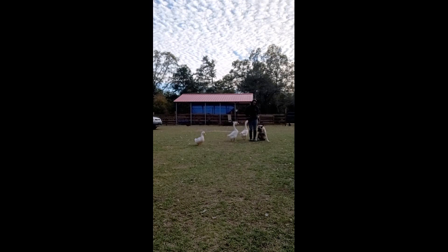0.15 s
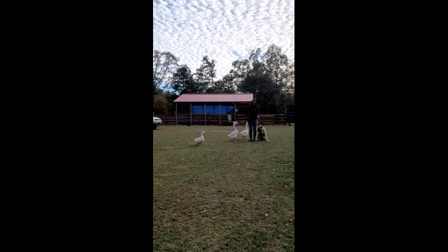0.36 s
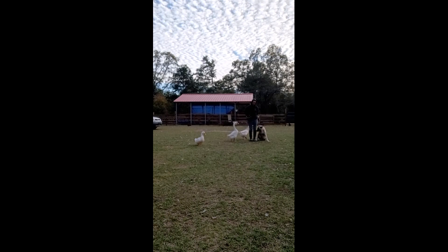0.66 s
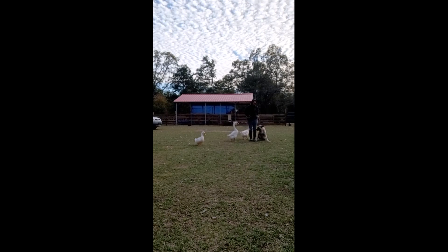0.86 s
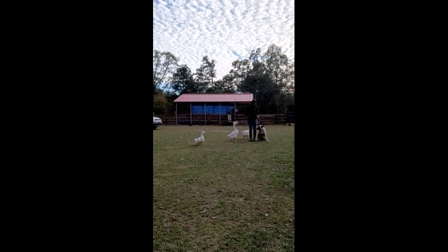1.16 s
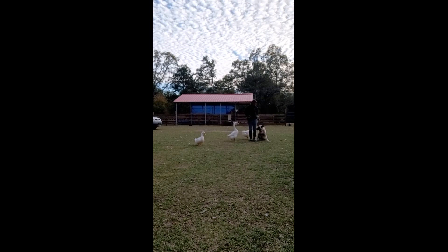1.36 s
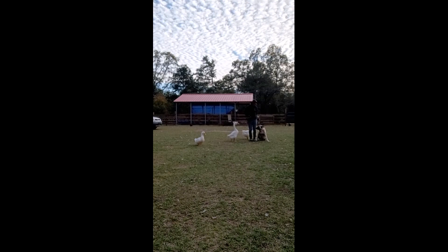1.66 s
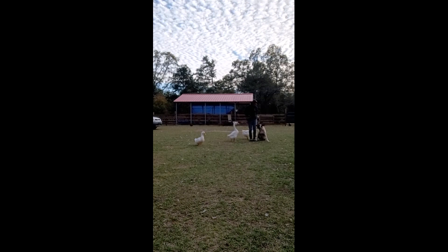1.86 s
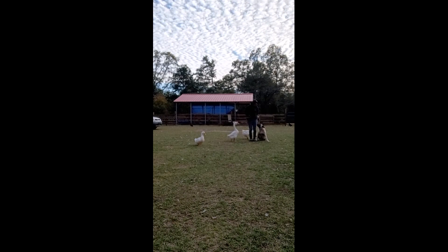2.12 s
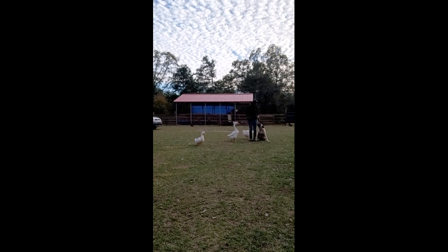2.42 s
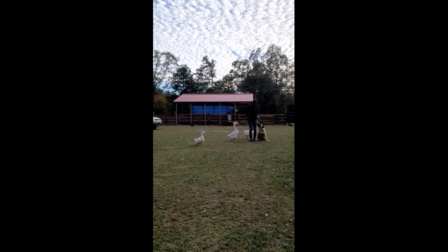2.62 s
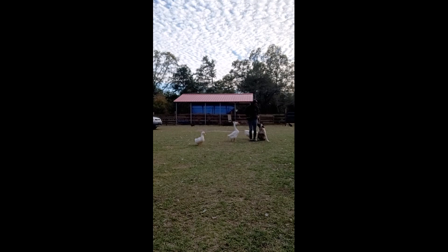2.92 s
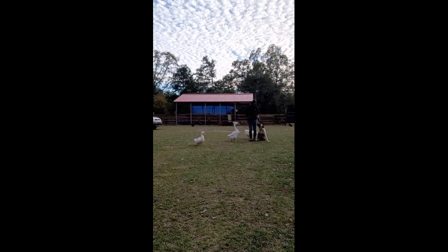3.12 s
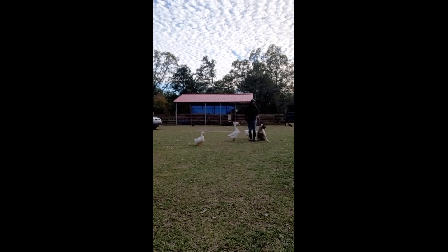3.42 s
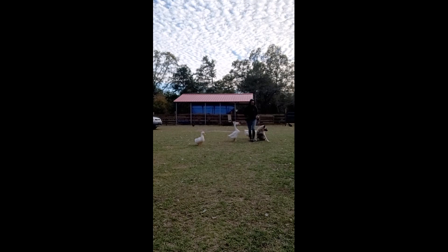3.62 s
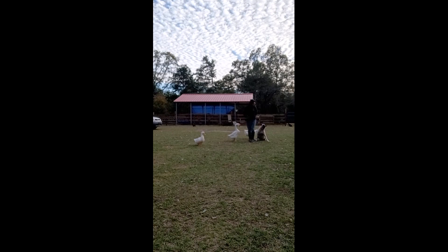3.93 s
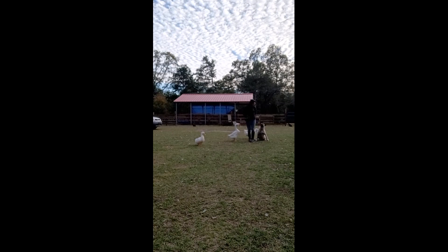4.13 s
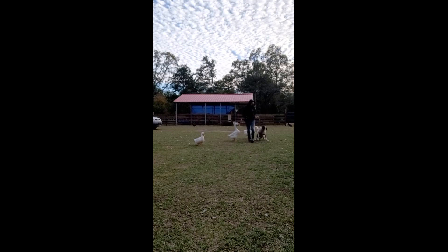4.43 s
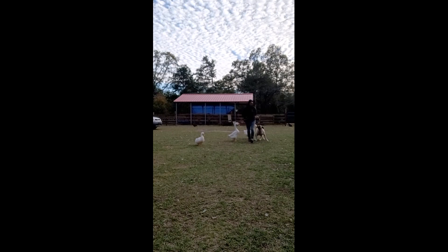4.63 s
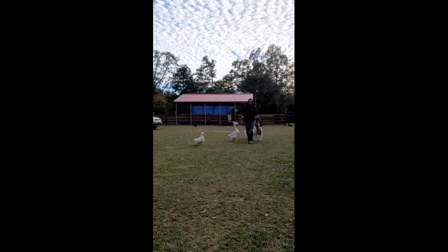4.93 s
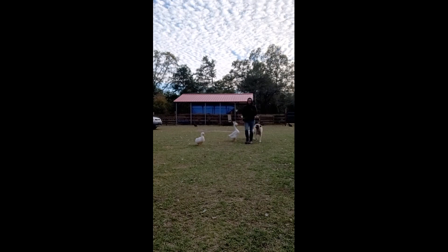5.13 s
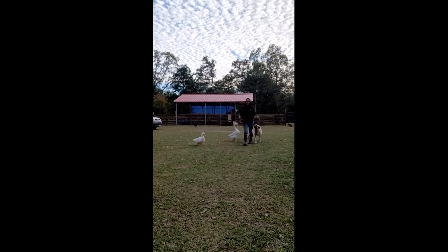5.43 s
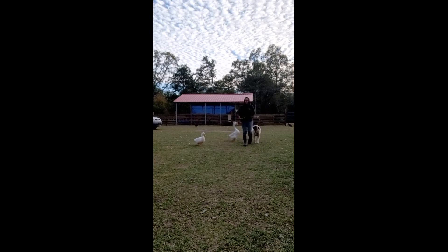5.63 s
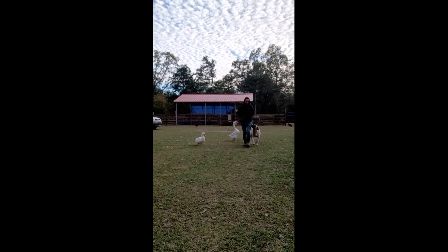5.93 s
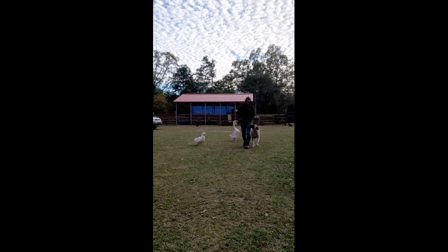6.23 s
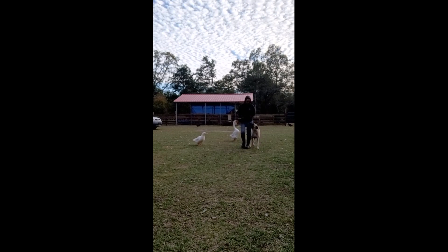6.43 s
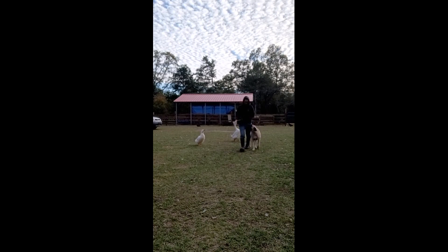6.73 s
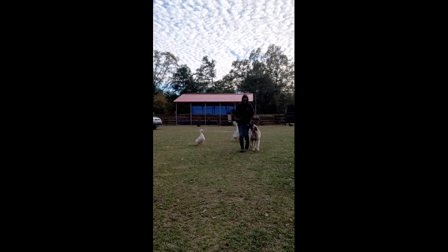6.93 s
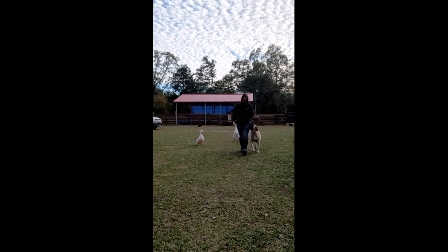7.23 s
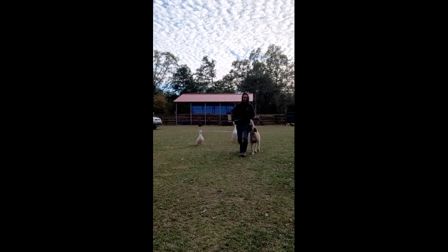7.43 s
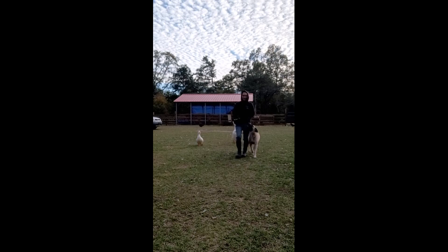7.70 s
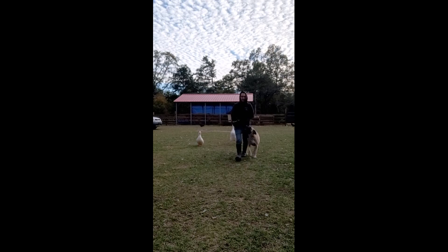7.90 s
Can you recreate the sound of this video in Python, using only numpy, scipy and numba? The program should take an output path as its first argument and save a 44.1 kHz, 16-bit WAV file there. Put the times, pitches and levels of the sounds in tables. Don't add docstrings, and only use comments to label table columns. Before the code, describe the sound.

Geese honk on an open lawn: one hoarse honk, then a short and a very long brassy trumpeting call, then overlapping hoarse honks and squeals.

```python
import sys
import numpy as np
from scipy import signal
from scipy.fft import rfft, irfft, next_fast_len
from scipy.io import wavfile
from numba import njit

SR = 44100
rng = np.random.default_rng(int(sys.argv[2]) if len(sys.argv) > 2 else 0)


def ratio_of_db(decibels):
    return 10 ** (np.asarray(decibels, float) / 20)


def materialize(psi):
    bounded = np.clip(np.atleast_2d(psi).T, -1, 1)
    quanta = np.round(bounded * 32767).astype(np.int16)
    wavfile.write(sys.argv[1], SR, quanta)


N = 355425

# start [t/s], voice locks [t/s], release [t/s], end [t/s], last pitch [f/Hz]
TRUMPET_HONKS = [
    (3.152, 3.217, 3.376, 3.46, 710),
    (3.453, 3.503, 5.035, 5.12, 320.6),
]
# [f/Hz], [level/dB]
YELP_FILTER = [(400, -5), (1000, -7), (1500, -11.5), (2000, -11.5), (3000, -19.5), (4000, -24), (6000, -27),
               (12000, -55.5)]
# [f/Hz], [level/dB]
WHOOP_FILTER = [(500, -10), (1150, -2), (2300, -19.5), (3500, -21), (6000, -32.5), (12000, -53)]
# share of length to the top, first dB, last dB, effort in dB per octave
YELP_COURSE = (.5, -6, -16.5, -2.5)
YELP_CURVE = (14, 14)


def rms_one(x):
    return x / np.sqrt(np.mean(x ** 2) + 1e-20)


def span(rows):
    s, *columns = np.transpose(rows)
    at = np.arange(int(s[0] * SR), min(int(s[-1] * SR), N))
    return at, [np.interp(at / SR, s, c) for c in columns]


def in_time(rows):
    s, *columns = np.transpose(rows)
    return [np.interp(np.arange(N) / SR, s, c) for c in columns]


def at_hz(points, hz):
    p = np.array(points)
    return np.interp(np.log(hz + 1), np.log(p[:, 0] + 1), p[:, 1])


def drift(hz, size):
    r = np.exp(-2 * np.pi * hz / SR)
    return rms_one(signal.lfilter([1], [1, -2 * r, r * r], rng.standard_normal(size + SR))[SR:])


def fade(size, s):
    k = np.arange(size)
    return np.clip(np.minimum(k, size - k) / (s * SR), 0, 1)


def sections(order, hz, kind):
    return signal.butter(order, hz, kind, fs=SR, output="sos")


@njit
def resonate(x, hz, width, sr):
    y, r = np.zeros(len(x)), np.exp(-np.pi * width / sr)
    for i in range(2, len(x)):
        drive = (1 - r * r) / 2 * (x[i] - x[i - 2])
        y[i] = drive + 2 * r * np.cos(2 * np.pi * hz[i] / sr) * y[i - 1] - r * r * y[i - 2]
    return y


def banded_noise(spectrum, low_hz, top_hz, patchy_db):
    # [f/Hz], [correlation]
    likeness = [(30, 0.93), (125, 1), (300, 0.97), (1000, 0.76), (3000, 0.1), (12000, 0.042)]
    out, together = 0, drift(4, N)
    edges = np.geomspace(low_hz, top_hz, int(3 * np.log2(top_hz / low_hz)) + 1)
    white = rng.standard_normal((2, 2, N))
    for k, (low, high) in enumerate(zip(edges, edges[1:])):
        mid, side = signal.sosfilt(sections(2, [low, high], "band"), white[k % 2])
        hz = np.sqrt(low * high)
        alike = np.clip(at_hz(likeness, hz), -1, 1)
        gain = ratio_of_db(at_hz(spectrum, hz) + patchy_db * (.6 * together + drift(8, N)))
        out = out + gain * (np.sqrt(1 + alike) * mid + np.sqrt(1 - alike) * side * [[1], [-1]])
    return rms_one(out)


def background():
    # [t/s], [level/dB]
    hiss_course = [
        (0, -3.5),
        (1.0, -2),
        (1.3, -11.5),
        (1.8, -5.5),
        (4.9, 12),
        (5.2, 6),
        (8.06, 4.5),
    ]
    # [f/Hz], [density/dB per Hz]
    hum_spectrum = [(12, -64), (20, -48), (59, -4), (141, -5.5), (217, -11), (319, -6), (361, -10.5),
                    (706, -18), (831, -12), (978, -19), (1170, -19), (1380, -27), (1840, -45),
                    (2350, -46.5), (2600, -50), (3380, -80), (5720, -120)]
    # [f/Hz], [density/dB per Hz]
    hiss_spectrum = [(1060, -25.5), (1800, 9.5), (2390, -6.5), (5970, -3.5), (8130, -18), (13500, -14),
                     (15100, -6.5), (15800, -20)]
    course_db, = in_time(hiss_course)
    start, end = TRUMPET_HONKS[0][0], TRUMPET_HONKS[-1][3]
    duck_db, fall_s, back_s = -6.5, 0.54, 0.087
    rebound_db, rebound_s = -1, 0.47
    gain_db, = in_time([(start, 0), (start + fall_s, duck_db), (end - 2 * back_s, duck_db),
                        (end, rebound_db), (end + rebound_s, 0)])
    hum = ratio_of_db(-58 + 0.19 * course_db + gain_db) * banded_noise(hum_spectrum, 20, 2600, patchy_db=3.0)
    drone_hz, drone_width_hz = 140.0, 5.2
    drone = rms_one(resonate(rng.standard_normal(N), np.full(N, drone_hz), drone_width_hz, SR))
    hum = hum + ratio_of_db(-66.5 + gain_db + 1.9 * drift(2.5, N)) * drone
    return hum + ratio_of_db(-79 + course_db) * banded_noise(hiss_spectrum, 1200, 22000, patchy_db=1.2)


def ring(s, db, hz, t60, soft):
    out, at = np.zeros(N), np.arange(int(s * SR) + 1, min(int((s + t60) * SR), N))
    t = at / SR - s
    out[at] = ratio_of_db(db - 60 * t / t60) * (1 - np.exp(-t / soft)) * np.sin(2 * np.pi * hz * t)
    return out


def ticks():
    # [t/s], ring [level/dB], pitch [f/Hz], decay [t60/s], rustle [level/dB]
    small_sounds = [(.018, -62.5, 2510, 0.032, -77), (.066, -63, 1970, 0.084, -62.5),
                    (0.414, -63, 4600, 0.072, -59), (.495, -55, 1640, 0.11, -77),
                    (.53, -57, 1415, 0.085, -73), (.659, -48, 2230, 0.022, -52.5),
                    (0.669, -37, 2740, 0.0025, -48), (.775, -64, 2400, 0.15, -65),
                    (1.499, -61, 2450, 0.025, -93), (1.572, -45, 2400, 0.015, -65),
                    (2.25, -63, 1577, 0.058, -88), (2.63, -68, 3590, 0.071, -94),
                    (2.67, -72, 2960, 0.09, -93), (2.8, -61, 2220, 0.034, -91),
                    (2.96, -46, 690, 0.099, -84), (5.216, -52, 150.8, 0.15, -65),
                    (5.281, -78, 1499, 0.03, -61), (5.398, -75, 304, 0.13, -60.5),
                    (5.894, -44.5, 254, 0.25, -98), (7.002, -37, 79.6, 0.076, -81),
                    (7.948, -40, 261, 0.16, -83)]
    rustle = rms_one(signal.sosfilt(sections(2, [1500, 7000], "band"), rng.standard_normal(N)))
    t, out = np.arange(N) / SR, np.zeros(N)
    for s, db, hz, t60, rustle_db in small_sounds:
        burst = np.clip((t - s) / (0.14 * t60), 0, 1) * ratio_of_db(rustle_db - 60 * np.maximum(t - s, 0) / t60)
        out += ring(s, db, hz, t60, t60 / 20) + rustle * burst
    return out


def growl_shape(honk, gape, end_db):
    s, rise, fall, db, per_s = honk
    low_hz, high_hz, gape_hz, last_hz, bright_db = gape
    steps = [(0, -23, -10), (min(0.02, 0.32 * rise), -6.5, 0), (rise, 0, 0),
             (rise + fall / 2, -6, end_db / 2), (rise + fall, -17, end_db)]
    rows = []
    for t, step_db, shine_db in steps:
        sag = 0.9 ** (max(t - rise, 0) / fall) ** 2
        gape_now_hz = gape_hz + (last_hz - gape_hz) * t / (rise + fall)
        rows.append((s + t, db + step_db, per_s, low_hz * sag, high_hz, bright_db + shine_db, gape_now_hz))
    return rows


def growls(jitter, breath, size_db, chest_db):
    # start [t/s], rise [t/s], fall [t/s], top [level/dB], pulse rate [f/Hz]
    hoarse = [
        (.85, 0.06, 0.13, -29.5, 142),
        (5.94, 0.062, 0.054, -40.5, 109),
        (6.08, 0.051, 0.076, -48, 130),
        (6.535, 0.077, 0.083, -29, 136),
        (6.675, .07, .115, -30.5, 205),
        (7.413, 0.074, .115, -25, 135),
        (7.63, 0.026, .135, -29.5, 133),
        (7.8, 0.028, .12, -27.5, 146),
    ]
    # low and high resonance [f/Hz], gape first and last [f/Hz], brightness [level/dB]
    gapes = [(1132, 1450, 3750, 3300, -9), (1378, 1660, 2700, 2500, -6.5), (986, 1540, 3800, 3700, 2),
             (1250, 1580, 2820, 2800, -11.5), (1158, 1575, 3020, 2940, -7.5),
             (1072, 1443, 3000, 2264, -8.5), (1184, 1755, 3800, 2800, -8), (1089, 1670, 2800, 2500, -7.5)]
    # top resonance first and last [f/Hz], its [level/dB], brightness at the end [level/dB],
    # high against low resonance [level/dB]
    shine = [(3900, 6300, 8, -1, -1), (3500, 4000, 15.5, 9, -11.5), (3700, 3600, 5, -8.5, -4),
             (4960, 5000, -1, -4.5, -4.5), (3600, 6400, 6.5, 17.5, -4.5), (4340, 5500, 3.5, 9, -6.5),
             (4470, 6400, 10, 13.5, -8.5), (4500, 4300, 4, 8.5, -11.5)]
    # [f/Hz], width [f/Hz], [level/dB]
    chest = [(450, 50, -16), (820, 70, -13), (960, 60, -4)]
    # [f/Hz], width [f/Hz], [level/dB]
    bill = [(2400, 350, 11), (2756, 610, 13), (3290, 310, 7.5), (3940, 630, 4), (4300, 270, -3.5),
            (5530, 1500, -15.5), (6900, 620, -20.5), (14500, 1800, -21)]
    puff_s, chaos_rise_s, wander = 0.0054, 0.026, .045
    out = np.zeros(N)
    for honk, gape, (first_hz, last_hz, top_db, end_db, high_db) in zip(hoarse, gapes, shine):
        at, columns = span(growl_shape(honk, gape, end_db))
        level_db, per_s, low_hz, high_hz, bright_db, gape_hz = columns
        size = len(at)
        cycle = np.cumsum(per_s * (1 + jitter * drift(70, size)) / SR)
        starts = np.diff(np.floor(cycle), prepend=0) > 0
        pulses = starts * ratio_of_db(size_db * rng.standard_normal(size))
        decay = np.exp(-1 / (puff_s * SR))
        puff = signal.lfilter([1], [1, -decay], pulses) * rng.standard_normal(size)
        pulses, puff = rms_one(pulses), rms_one(puff)
        chaos = np.minimum(np.arange(size) / SR / chaos_rise_s, 1)

        def twice(source, hz, width, moving):
            return resonate(resonate(source, hz * moving, width, SR), hz * moving, 2 * width, SR)

        source = pulses + breath * chaos * puff
        moving = 1 + wander * drift(10.8, size)
        low = (0.32 + 0.72 * chaos) * twice(source, low_hz, 69.0, moving)
        low -= ratio_of_db(high_db) * twice(source, high_hz, 234.0, moving)
        for k, (hz, width, db) in enumerate(chest):
            low += ratio_of_db(db) * twice(source, hz, width, moving) * (-1) ** k

        source = (1 - .4 * chaos) * pulses + 2.4 * breath * chaos * puff
        moving = 1 + wander * drift(7.4, size)
        high = ratio_of_db(top_db) * twice(source, np.linspace(first_hz, last_hz, size), 670.0, moving)
        for k, (hz, width, db) in enumerate(bill):
            high += ratio_of_db(db) * twice(source, hz, width, moving) * (-1) ** k
        high += ratio_of_db(18.5) * twice(source, gape_hz, 300., moving)
        hum = ratio_of_db(chest_db) * np.sin(2 * np.pi * cycle)
        voice = rms_one(low) + ratio_of_db(bright_db) * rms_one(high) + hum
        out[at] += ratio_of_db(level_db - 1.5) * fade(size, 0.005) * voice
    return out


def syrinx(pitch, colour, half_db, quarter_db, rough, rasp, even=0.):
    size = len(pitch)
    phase = np.cumsum(2 * np.pi * pitch / 4 / SR) + rough * .25 * drift(70, size)
    flutter = [drift(130, size) for group in range(7)]
    out, power = np.zeros(size), np.zeros(size)
    for k in range(2, 84):
        hz, top_hz = k * pitch / 4, k * pitch.max() / 4
        if k % 4 == 0:
            line_db = 0
        else:
            line_db = half_db[::32] if k % 2 == 0 else quarter_db[::32]
        weak = 1 - even * np.interp(top_hz, [3000, 4500], [0, 1])
        gain = ratio_of_db(colour(hz[::32]) + weak * line_db)
        gain = np.interp(np.arange(size) / 32, np.arange(len(gain)), gain) * (hz < .45 * SR)
        if k <= 3:
            gain *= ratio_of_db(-33)
        torn = rasp * np.interp(top_hz, [1900, 2300, 3800, 4100], [0, .6, .6, 1])
        chaos = np.clip(1.3 * rough + torn, 0, 1)
        steadiness = np.sqrt(1 - chaos ** 2) + chaos * flutter[k % 7]
        out += gain * steadiness * np.sin(k * phase + .13 * k * k)
        power += gain ** 2 / 2
    return out / np.sqrt(power)


def arcs(notes, arc, bend):
    share, first_db, last_db, tilt_db = arc
    steps = np.linspace(-1, 1, 9)
    rising = steps < 0
    calls = []
    for s, length, hz, db, half_db in notes:
        away = length * steps * np.where(rising, share, 1 - share)
        pitch = hz * (1 - np.where(rising, *bend) * away ** 2)
        level_db = db + np.where(rising, first_db, last_db) * steps ** 2
        calls.append([(s + share * length + t, p, d, half_db, tilt_db) for t, p, d in zip(away, pitch, level_db)])
    return calls


def clear_notes(calls, throat, rough, trim_db, rasp, order=1, quarter_db=-19.5):
    out = np.zeros(N)
    for rows in calls:
        at, (pitch, level_db, half_db, tilt_db) = span(rows)

        def colour(hz):
            return at_hz(throat, hz) + tilt_db[::32] * np.log2(np.maximum(hz / 1500, 1))

        voice = syrinx(order * pitch, colour, half_db, half_db + quarter_db, rough, rasp)
        out[at] += ratio_of_db(level_db + trim_db) * fade(len(at), 0.013) * voice
    return out


def split_yelp():
    first_yelp = [(.868, 0.128, 1006, -33, -10)]
    return clear_notes(arcs(first_yelp, YELP_COURSE, (17, 22)), YELP_FILTER,
                       rough=0.038, trim_db=5.0, rasp=0.41, quarter_db=-5.5)


def squeals():
    notes = [
        (1.0, .17, 731.5, -45, -1),
        (1.17, 0.1, 715, -61.5, -1),
        (1.28, 0.095, 689, -67.5, 1),
        (6.045, .09, 738, -55.5, -5),
        (6.8, 0.092, 731, -39, -9),
        (7.815, 0.057, 740, -36.5, -12.5),
        (7.895, .15, 734, -49.5, -4),
    ]
    # [f/Hz], [level/dB]
    throat = [(350, -29.5), (740, 21.5), (1480, -0.5), (2200, -4.5), (2950, -7), (3700, -12), (4350, -8),
              (5000, -22.5), (7400, -35), (10000, -43), (15000, -37)]
    return clear_notes(arcs(notes, (.27, -4, -13.5, -4.5), (12, 7)), throat,
                       rough=0.04, trim_db=7.0, rasp=.2, order=2)


def far_call():
    # [t/s], [level/dB]
    swelling = [(2.05, -77), (2.25, -58.5), (2.4, -73), (2.6, -61.5), (2.85, -106)]
    level_db, = in_time(swelling)
    return ratio_of_db(level_db) * np.sin(np.cumsum(2 * np.pi * 975 * (1 + 0.022 * drift(5.8, N)) / SR))


def bill_colour(hz, closing, main_hz, nasal_db, top_db, effort_db, second_hz, second_db, main_width_hz,
                dip_hz, ring_db, main_db):
    # [f/Hz], [level/dB]
    open_bill = [(300, -45), (530, -16), (760, -1), (1150, -0.5), (1530, -2), (1920, -2.5), (2290, -13.5),
                 (3050, -7.5), (3500, -11), (4000, -56), (15500, -55)]
    # [f/Hz], [level/dB]
    closing_bill = [(300, 14.5), (530, -1), (750, -23.5), (1130, -24), (1500, 1.5), (1900, -32.5),
                    (2250, -20.5), (2650, -27.5), (3000, -31.5), (3500, -64.5), (4000, -76.5),
                    (15500, -54.5)]
    # open [f/Hz], closing [f/Hz], width [f/Hz], open [level/dB], closing [level/dB]
    upper = [(4600, 4610, 620, -18, -33), (8050, 6000, 1670, -26, -59), (10800, 8300, 470, -42.5, -26),
             (12700, 10100, 330, -46, -39), (13500, 11800, 700, -61, -46.5), (14800, 14500, 1000, -46, -42)]
    power = ratio_of_db(at_hz(open_bill, hz) * (1.5 - closing) + at_hz(closing_bill, hz) * closing) ** 2
    peaks = [(a + (b - a) * closing, width, a_db + (b_db - a_db) * closing) for a, b, width, a_db, b_db in upper]
    peaks += [(second_hz, 290, second_db), (main_hz, main_width_hz, main_db - 17 + closing),
              (4267, 210, nasal_db)]
    for centre, width, db in peaks:
        power = power + ratio_of_db(db) ** 2 / (1 + 4 * ((hz - centre) / width) ** 2) ** 2
    dip = -20 * np.exp(-((hz - dip_hz) / 130) ** 2)
    bump = ring_db * np.exp(-((hz - 2800) / 350) ** 2)
    top = top_db * np.interp(hz, [8800, 9100, 13200, 14000], [0, 1, 1, 0])
    effort = effort_db * np.interp(hz, [1650, 1900, 3400, 3900], [0, 1, 1, 0])
    return 10 * np.log10(power) + dip + bump + top + effort


def crack(t, s, length):
    return np.clip(np.minimum(t - s, s + length - t) / 0.015, 0, 1)


def trumpet():
    # [t/s], pitch [f/Hz], breath [level/dB]
    held_parts = [
        [(3.213, 731.3, -20.5), (3.376, 746.4, -20)],
        [(3.503, 765.6, -21.5), (3.56, 778.7, -21.5), (3.675, 737.5, -21.5), (3.722, 746.4, -22),
         (3.77, 763, -21), (3.886, 774.3, -21), (3.96, 759.5, -21), (4.07, 766.3, -21), (4.25, 762.8, -23),
         (4.5, 754.8, -22.5), (4.7, 752, -23.5), (4.83, 742, -26), (4.93, 727, -22.5), (4.995, 728.4, -24),
         (5.015, 709.7, -26.5), (5.035, 696, -28)],
    ]
    # [t/s], half pitch [level/dB], quarter pitch [level/dB], bill closing [0-1]
    throats = [
        [(3.213, -4, -28, 0.48), (3.3, -3, -24.5, 0.53), (3.376, -1.5, -15, 0.43)],
        [(3.503, -4, -24, 0.26), (3.6, -9, -22.5, 0.07), (4.07, 1, -19.5, 0.24), (4.28, 4, -24.5, 0.39),
         (4.42, -3, -12.5, 0.72), (4.69, -4, -23.5, 1), (4.8, 5.5, 0.5, 0.98), (4.93, -5.5, -11, 0.98),
         (4.97, -29, -26.5, 0.96)],
    ]
    rasps = [0.53, 0.39]
    # start [t/s], length [t/s], jump [f/Hz], change [level/dB], extra half and quarter [level/dB]
    cracks = [
        (3.571, .1, 74, 0.5, 8),
        (3.853, 0.049, 6.5, -0.2, 6),
        (4.074, 0.16, 47, 1.1, 0.5),
        (4.254, 0.05, 2.5, -0.5, -1.5),
        (4.551, 0.14, 4.5, -0.5, 4),
        (4.549, 0.02, -5.5, -8, 4.5),
        (4.632, 0.019, 1.5, -10, -0.5),
        (5.045, 0.023, -17, -19.5, -11),
    ]
    # [t/s], cancelled band [f/Hz], main upper resonance [f/Hz], nasal [level/dB], over 9 kHz [level/dB]
    neck = [(3.16, 3700, 5280, -44, 11), (3.27, 3500, 5750, -47, 0), (3.38, 3900, 5440, -55, -3.5),
            (3.46, 3990, 5020, -45, -23), (3.6, 3900, 5340, -61.5, -17.5), (3.72, 3680, 5180, -34.5, -9),
            (3.85, 3600, 5180, -42.5, -8), (4.08, 3700, 5230, -41, -1.5), (4.2, 3500, 5210, -36, 0),
            (4.32, 3850, 5220, -50.5, -3.5), (4.51, 3700, 5360, -47, 6), (4.75, 4030, 5650, -55, 0.5),
            (4.9, 3600, 5530, -43.5, 7.5), (4.97, 3600, 5510, -28.5, -2.5),
            (5.02, 3600, 6030, -15.5, -12.5), (5.12, 3500, 5700, -12, -1)]
    # [t/s], [level/dB]
    effort = [(3.16, 8.5), (3.23, -1.5), (3.27, -3), (3.37, -2), (3.46, 5.5), (3.51, 5.5), (3.55, 3),
              (3.6, 0.5), (3.75, 2), (4.07, -1), (4.12, 3), (4.24, 1), (4.32, -7.5), (4.5, -11.5),
              (4.75, -2.5), (4.88, 3.5), (5.0, -8.5), (5.12, 2.5)]
    # [t/s], second resonance [f/Hz], its [level/dB], main width [f/Hz], dip [f/Hz]
    head = [(3.16, 6830, -29.5, 693, 6470), (3.38, 6540, -28.5, 722, 6360), (3.5, 6490, -20, 445, 6020),
            (3.72, 6400, -14.5, 444, 5910), (3.95, 6490, -21.5, 420, 6120), (4.3, 6500, -28.5, 441, 5900),
            (4.5, 6540, -16.5, 496, 6080), (4.68, 6690, -17.5, 485, 5880), (4.85, 6660, -24.5, 437, 6180),
            (5.0, 6920, -32.5, 450, 6320)]
    # [t/s], share of roughness [1], ring near 2.8 kHz [level/dB], main resonance [level/dB]
    steady = [(3.16, 1, -6.5, 3.5), (3.3, 0.88, -10, -3.5), (3.5, 0.96, -3, -1), (4.0, 1.24, -7, 0),
              (4.25, 0.66, -7, -1.5), (4.35, 0.64, 11, 1), (4.53, 0.43, 19.5, 4.5), (4.6, 0.71, 10, 2.5),
              (4.7, 0.77, 5, 4.5), (4.85, 0.65, -11, 1), (5.0, 0.5, -12.5, -4.5)]
    cancel_hz, *neck_columns = in_time(neck)
    rough_share, *steady_columns = in_time(steady)
    posture = neck_columns + in_time(effort) + in_time(head) + steady_columns
    lock_s, let_go_s = .013, 0.016
    out = np.zeros(N)
    for (start, lock, release, end, last_hz), held, throat, rasp in zip(TRUMPET_HONKS, held_parts, throats, rasps):
        (_, hz_in, db_in), (_, hz_out, _) = held[0], held[-1]
        scoop = [(start, .76 * hz_in, db_in - 24), (start + .025, .76 * hz_in, db_in - 5),
                 (lock - lock_s, .84 * hz_in, db_in - 5)]
        drop = [(release + let_go_s, .93 * hz_out, -28.5), (end - let_go_s, last_hz, -39.5), (end, last_hz, -55)]
        at, (pitch, level_db) = span(scoop + held + drop)
        t = at / SR
        half_db, quarter_db, closing = [c[at] for c in in_time(throat)]
        loose = 1 - np.clip(np.minimum(t - lock + lock_s, release + lock_s - t) / lock_s, 0, 1)
        loose_db = np.where(t < lock, -15, -13)
        half_db += loose * (loose_db - half_db)
        quarter_db += loose * (loose_db - 15.5 - quarter_db)
        closing = np.clip(closing + loose * (np.where(t < lock, 0.11, 0.8) - closing), 0, 1)
        dull_db = -2.5 * loose * (t > lock) * 2 * (1 - last_hz / hz_out)
        rough = 0.058 * (1.4 - 0.49 * closing) + 0.27 * loose
        for s, length, jump_hz, change_db, sub_db in cracks:
            on = crack(t, s, length)
            pitch = pitch + on * jump_hz * (1 - .3 * (t - s) / length)
            level_db = level_db + on * change_db
            rough = rough + on * 0.18
            half_db, quarter_db = half_db + on * sub_db, quarter_db + on * sub_db
        settings = [c[at][::32] for c in posture]

        def colour(hz):
            dull = dull_db[::32] * np.log2(np.maximum(hz / 1800, 1))
            return bill_colour(hz, closing[::32], *settings) + dull

        rough = np.abs(rough * rough_share[at])
        voice = syrinx(pitch, colour, half_db, quarter_db, rough, rasp * (1 - closing ** 3) ** 2, even=0.35)
        voice = ratio_of_db(level_db) * fade(len(at), 0.0074) * voice
        drop_noise = rms_one(signal.sosfilt(sections(2, [5200, 11000], "band"), rng.standard_normal(len(at))))
        voice += ratio_of_db(level_db - 29.5) * fade(len(at), .006) * loose * (t > release) * drop_noise
        thin = signal.sosfiltfilt(sections(3, 560, "high"), voice)
        voice += (1 - closing) * (thin - voice)
        shut = signal.sosfiltfilt(sections(2, [3180, 3720], "bandstop"), voice)
        out[at] += voice + np.minimum(2 * closing, 1) * (shut - voice)
    width_hz = 560
    for shift in (-.3, 0, .3):
        out = out - resonate(out, cancel_hz + shift * width_hz, width_hz, SR)
    return out


def yelps():
    notes = [
        (5.95, 0.1094, 455, -48, -16),
        (6.1, 0.08, 1067, -55.5, -15),
    ]
    return clear_notes(arcs(notes, YELP_COURSE, YELP_CURVE), YELP_FILTER, rough=0.075, trim_db=3.0, rasp=0.73)


def whoops():
    notes = [
        (6.02, .1, 1622, -54, -24),
        (6.7, .135, 1170, -33, -15.5),
        (7.637, .115, 1139, -30, -24),
    ]
    return clear_notes(arcs(notes, (1.04, -2, -16.5, -0.5), (10, 0)), WHOOP_FILTER,
                       rough=0.13, trim_db=1.0, rasp=0.37)


def dull_yelps():
    notes = [
        (6.745, .09, 985, -34.5, -24),
        (7.68, .105, 1019, -32.5, -28),
    ]
    return clear_notes(arcs(notes, YELP_COURSE, YELP_CURVE), WHOOP_FILTER, rough=0.045, trim_db=1.0, rasp=.5)


def squeal_returns():
    # [t/s], peak [level/dB], sounds for [t/s], low mode [level/dB], middle mode
    # [level/dB]
    returns = [
        (6.805, -27, 0.032, -17, 0),
        (6.851, -33, 0.022, 6, -13),
        (6.884, -40, 0.086, 2.5, 2),
        (6.939, -42.5, 0.091, 3, -1),
        (7.03, -51, .11, -3, 3),
        (7.846, -38, 0.045, -8, 5.5),
        (7.89, -36, 0.18, 6, -15),
    ]
    # [f/Hz], [level/dB], decay [t60/s]
    modes = [(2240, -6, 0.4), (2610, 1, 0.4), (2950, -4, 0.4), (3760, -22, 0.1), (4150, -21, 0.15),
             (5600, -19, 0.06)]
    t, out = np.arange(N) / SR, 0
    for k, (hz, mode_db, t60) in enumerate(modes):
        rings = 0
        for s, db, length, *tint_db in returns:
            excited_db = tint_db[k] if k < len(tint_db) else 0
            damper = np.clip((s + length - t) / .025 + .5, 0, 1)
            rings = rings + ring(s, db + mode_db + excited_db, hz, t60, .012) * damper
        out = out + rings * ratio_of_db(3 * drift(25, N))
    return out


def swelling_shriek():
    swell = [(7.69, .115, 738, -32, -29)]
    # [t/s], [t/s], [f/Hz], [level/dB], [level/dB]
    shriek = [(7.772, 0.047, 742, -23.5, -14.5)]
    # [f/Hz], [level/dB]
    throat = [(350, -32), (740, 9.5), (1480, -1.5), (2200, -7), (2950, -5.5), (3700, -11.5), (4350, -13),
              (5900, -15.5), (7400, -18.5), (10000, -38.5), (15000, -33)]
    bend = (3.5, -10)
    calls = arcs(swell, (1.54, -14.5, -8.5, -1.5), bend) + arcs(shriek, (2.22, -21.5, -27, 4), bend)
    return clear_notes(calls, throat, rough=0.05, trim_db=9.5, rasp=0.19, order=2)


def sides(x, balance, phase):
    hz = np.fft.rfftfreq(N, 1 / SR)
    half = ratio_of_db(at_hz(balance, hz) / 2) * np.exp(.5j * at_hz(phase, hz))
    return np.array([irfft(rfft(x) * half, N), irfft(rfft(x) / half, N)])


def trumpet_sides(x):
    # [f/Hz], L-R [level/dB]
    facing_balance = [(60, -5), (110, -1.5), (200, 4.5), (380, -6), (700, 6.5), (1290, -5.5), (2380, 1.5),
                      (4400, 2), (8120, -3.5), (15000, -0.5)]
    # [f/Hz], left leads [phase/rad]
    facing_phase = [(0, 0), (800, 0), (1290, -.5), (1720, 1.3), (2410, -.6), (2840, 1.7), (3530, -.6),
                    (4390, .9), (5940, 1.2), (6800, .8), (9470, 2.2), (15500, 2.3)]
    # [f/Hz], L-R [level/dB]
    turned_balance = [(380, -2.5), (750, 7.5), (1130, -1), (1500, -5.5), (2400, 0.5), (4400, -1.5),
                      (6000, -7), (8120, -4.5), (15000, 1)]
    # [f/Hz], left leads [phase/rad]
    turned_phase = [(0, 0), (800, 0), (1550, -.4), (1890, 1.5), (2500, .5), (3010, 1.3), (3270, -.5),
                    (4570, .9), (5860, 1.5), (6980, 1.1), (10800, 1.8), (15500, 2.3)]
    # [t/s], [share]
    turning = [
        (4.2, 0),
        (4.6, 1),
    ]
    turn, = in_time(turning)
    return sides((1 - turn) * x, facing_balance, facing_phase) + sides(turn * x, turned_balance, turned_phase)


def flock_sides(x):
    # [f/Hz], L-R [level/dB]
    balance = [(60, 0.0), (110, 0.0), (200, -0.5), (380, -1.0), (700, 1.5), (1290, 0.5), (2380, -0.51),
               (4400, -0.5), (8120, 0.0), (15000, 1.0)]
    # [f/Hz], left leads [phase/rad]
    phase = [(0, 0), (1000, .06), (4000, .4), (16000, 1.5)]
    return sides(x, balance, phase)


def echoes(near, far):
    size = next_fast_len(N + 3 * SR)
    hz, out = np.fft.rfftfreq(size, 1 / SR), np.zeros((2, size // 2 + 1), complex)
    near, far = rfft(near, size), ratio_of_db(-19) * rfft(far, size)
    for k, lag in enumerate(rng.uniform(.035, 0.18, 20)):
        t60, sent = (1, near) if k % 4 < 2 else (7.1, far)
        loop = ratio_of_db(-60 * lag / t60 * (4.0 + (hz / 11000) ** 2)) * np.exp(-2j * np.pi * hz * lag)
        out[k % 2] += sent * loop / (1 - loop) * (-1) ** (k // 4)
    out = out + 0.13 * out[::-1]
    return irfft(out, size)[:, :N]


def slaps(x):
    # delay [t/s], [level/dB], L-R [level/dB]
    reflections = [
        (.045, -16, 8.5),
        (.095, -18.5, -5.5),
        (.118, -30, 7),
        (0.141, -35, -11),
        (0.164, -31.5, 7.5),
        (.205, -40.5, -2),
        (0.233, -36, 3.5),
        (0.371, -37.5, -2),
    ]
    dull, out = signal.sosfilt(sections(2, [600, 4500], "band"), x), np.zeros((2, N))
    for lag, db, pan_db in reflections:
        late = int(lag * SR)
        out[:, late:] += ratio_of_db(db + np.array([[pan_db / 2], [-pan_db / 2]])) * dull[:N - late]
    return out


def scene():
    air = background()
    hoarse = growls(jitter=.1, breath=.4, size_db=2.2, chest_db=-21.5)
    less_echoing = split_yelp() + squeals() + dull_yelps()
    flock = hoarse + yelps() + whoops() + swelling_shriek()
    near = trumpet()
    direct = flock + less_echoing + squeal_returns() + ticks() + far_call()
    echoing = flock + ratio_of_db(-7) * less_echoing
    sent = ratio_of_db(-13.5) * signal.sosfilt(sections(2, 2500, "low"), near)
    wet = echoes(sent + ratio_of_db(-2) * echoing, sent + ratio_of_db(-14) * echoing)
    wet = wet + slaps(echoing + ratio_of_db(-15) * near)
    return trumpet_sides(near) + flock_sides(direct) + wet + air


def roll_off(x):
    return signal.sosfilt(signal.butter(12, 15940, fs=SR, output="sos"), x)


def record(dry):
    ceiling = 1.5
    mix = ceiling * np.tanh(dry / ceiling)
    return roll_off(mix)


dry = scene()
out = record(dry)
materialize(out)
```